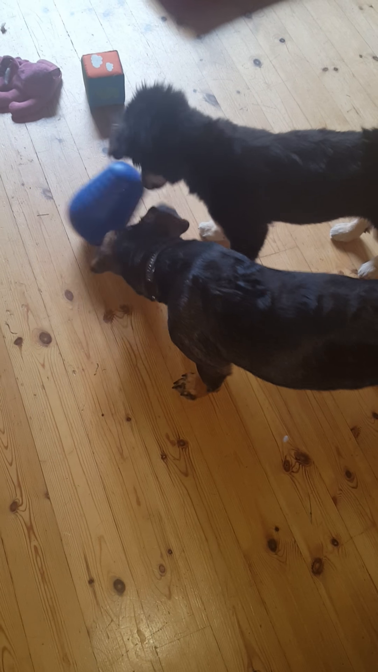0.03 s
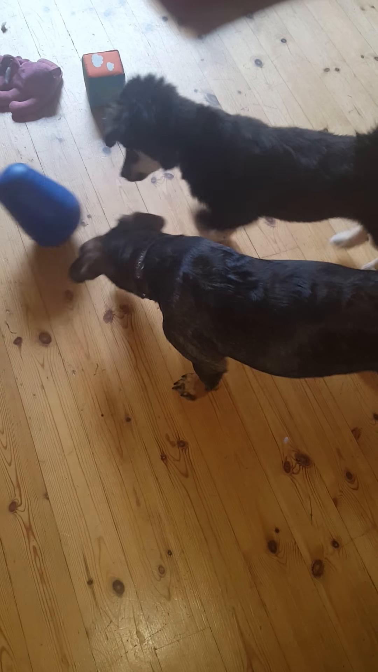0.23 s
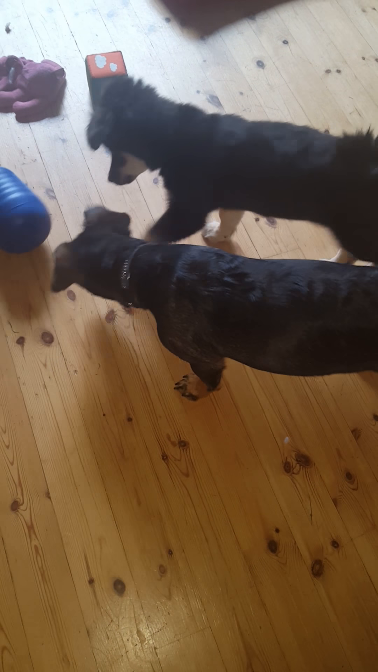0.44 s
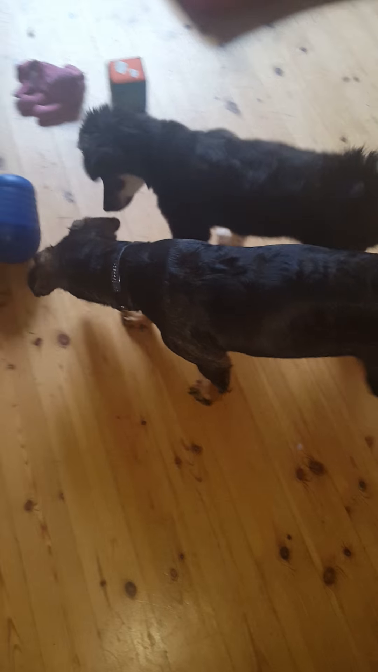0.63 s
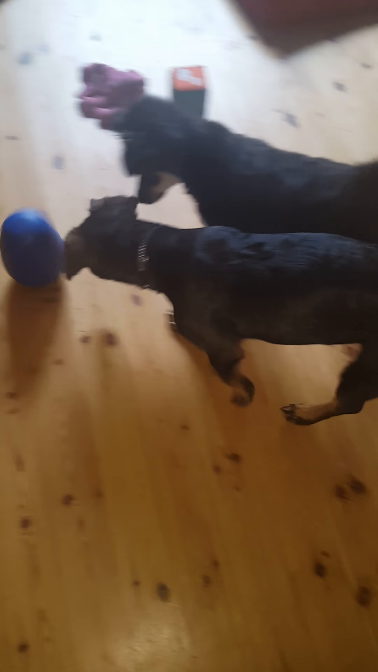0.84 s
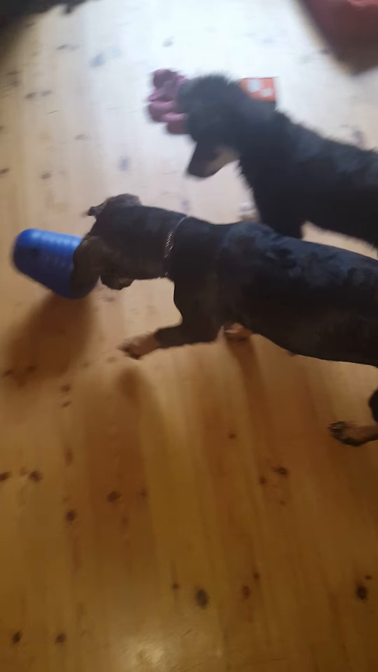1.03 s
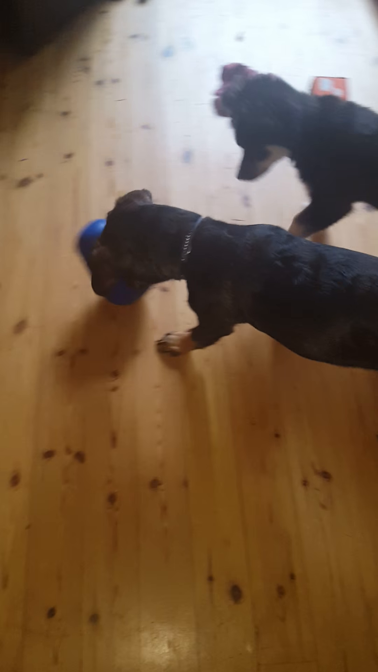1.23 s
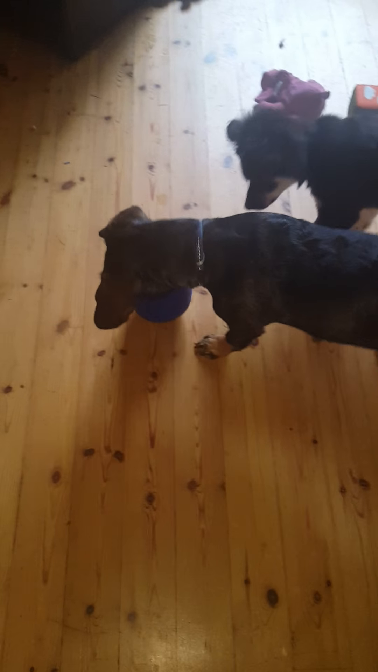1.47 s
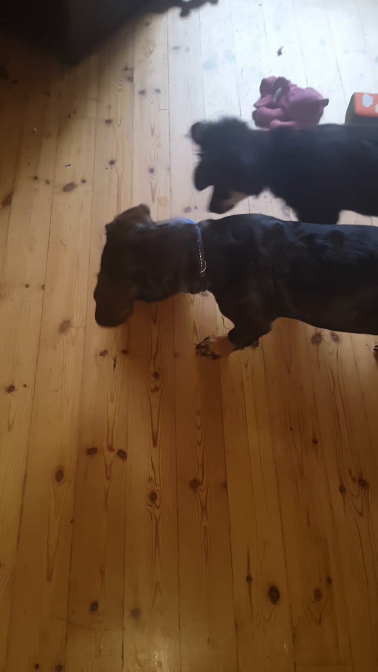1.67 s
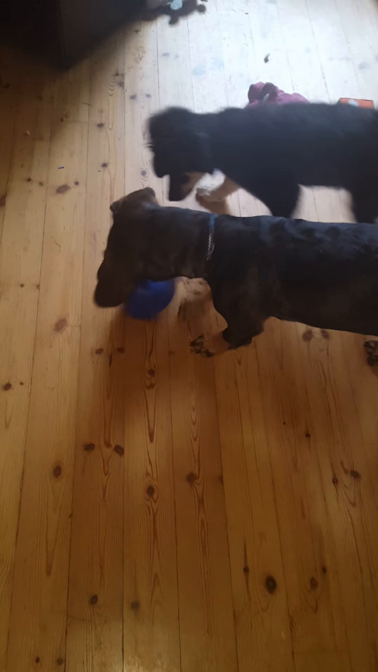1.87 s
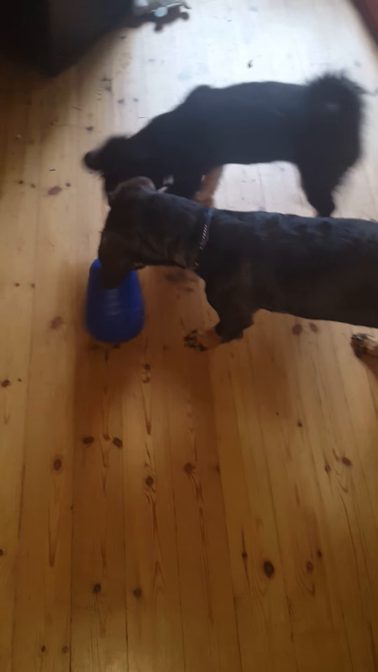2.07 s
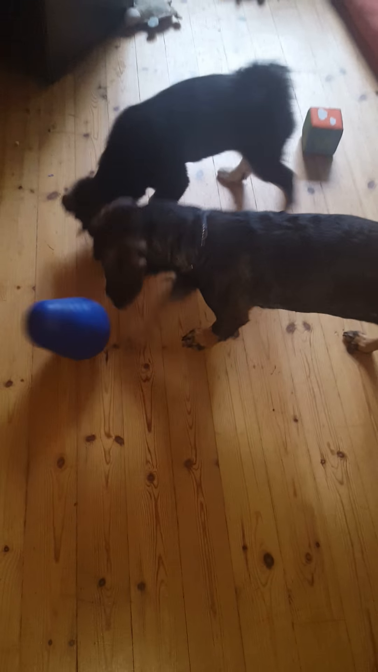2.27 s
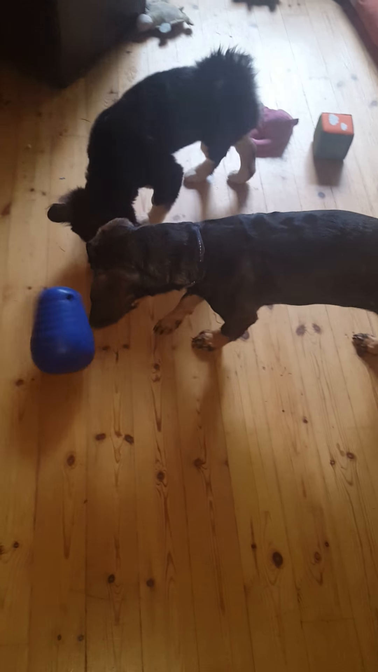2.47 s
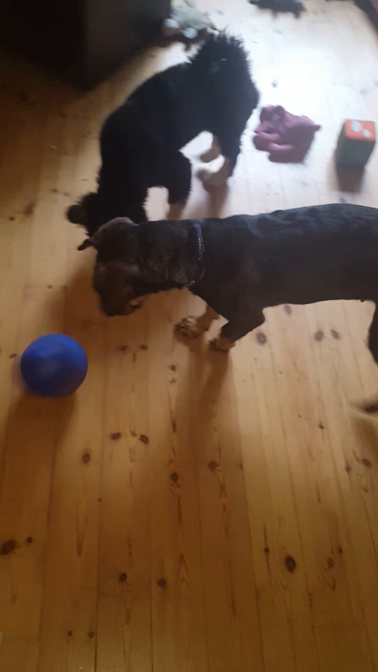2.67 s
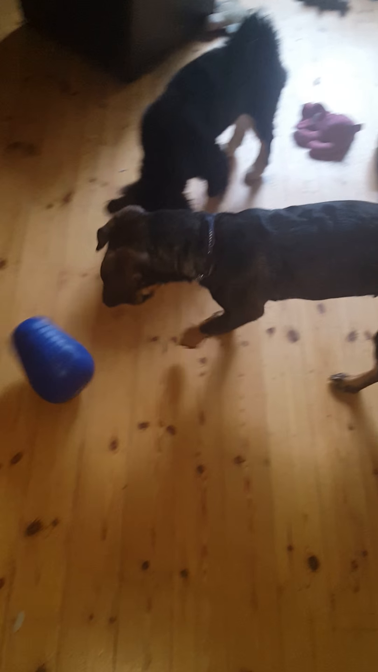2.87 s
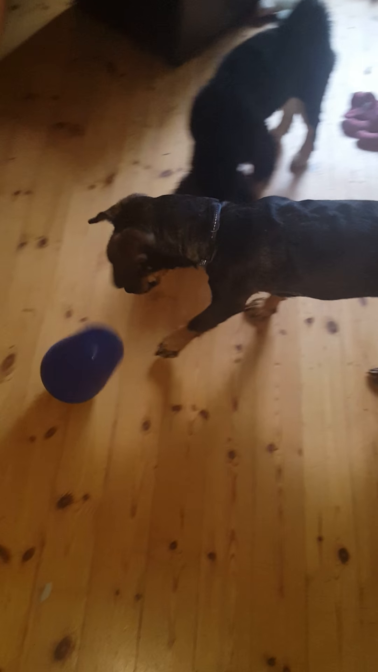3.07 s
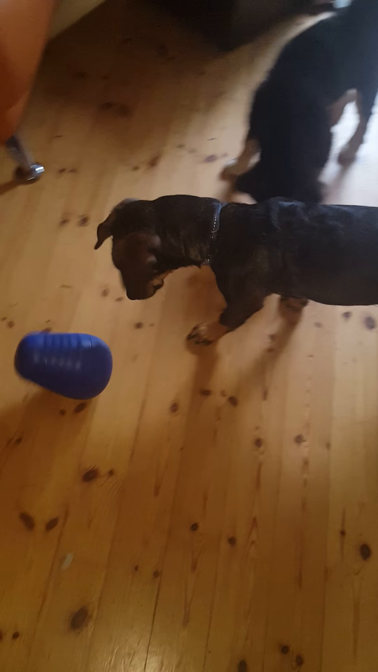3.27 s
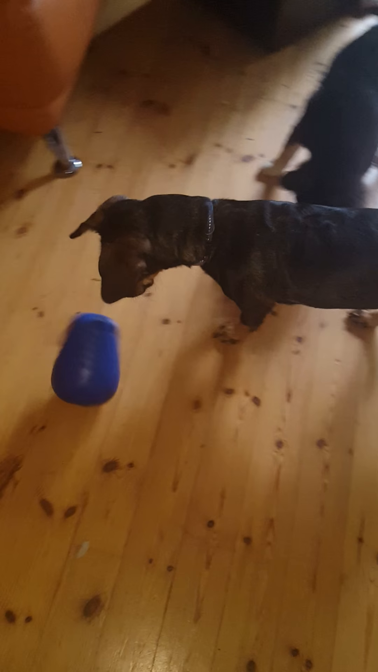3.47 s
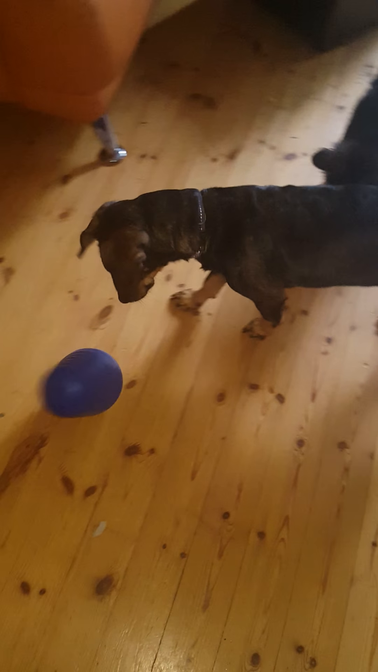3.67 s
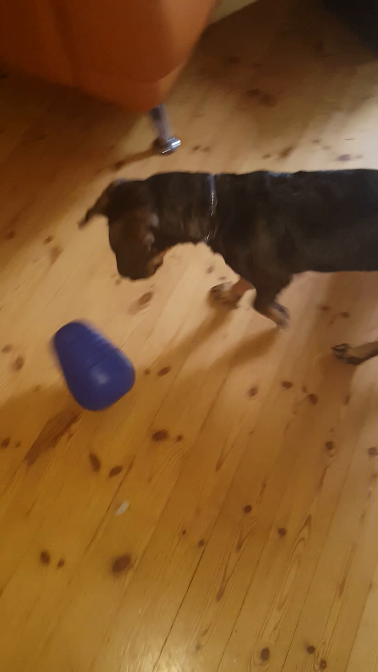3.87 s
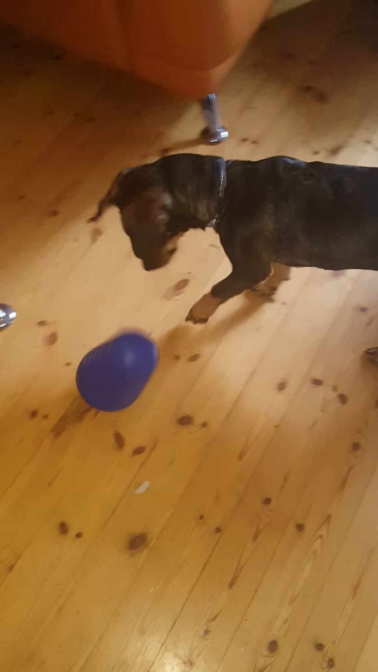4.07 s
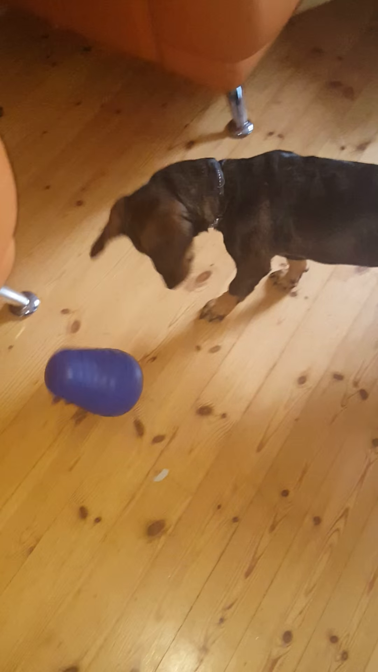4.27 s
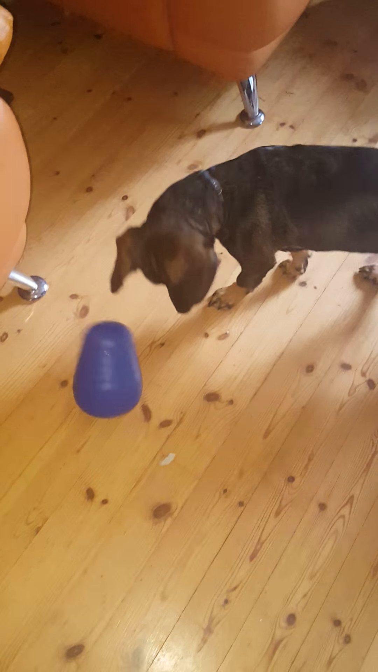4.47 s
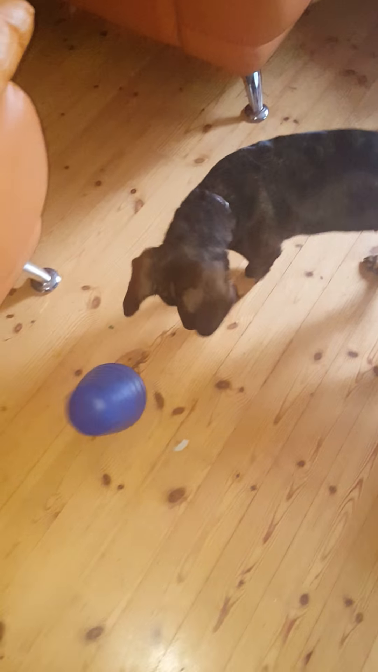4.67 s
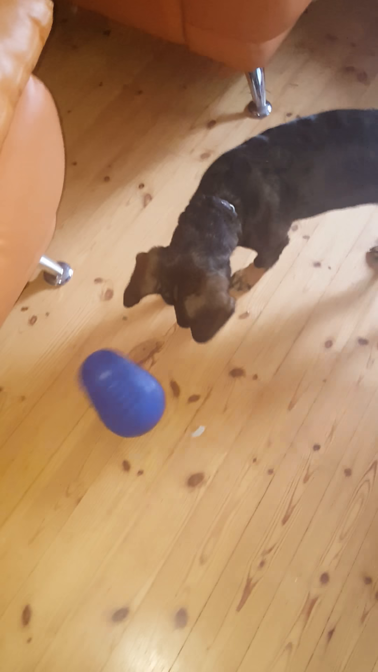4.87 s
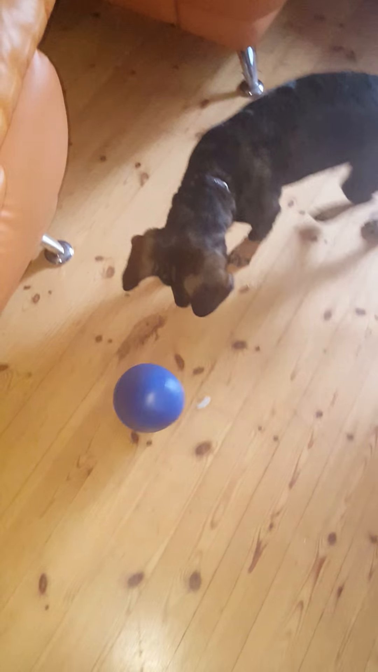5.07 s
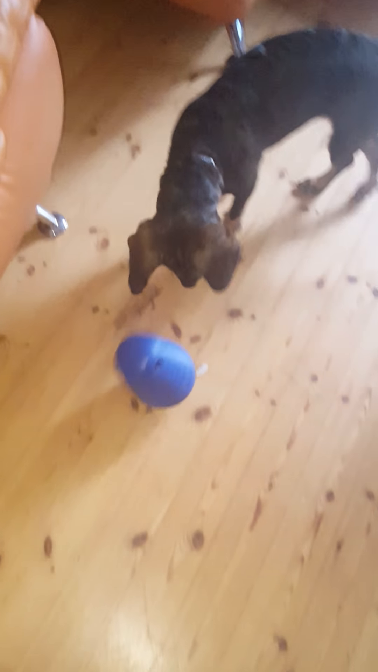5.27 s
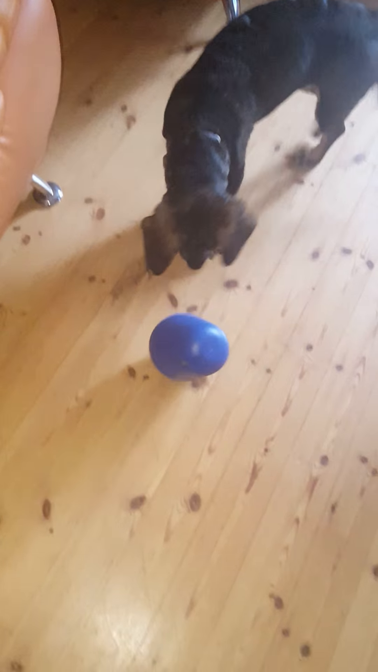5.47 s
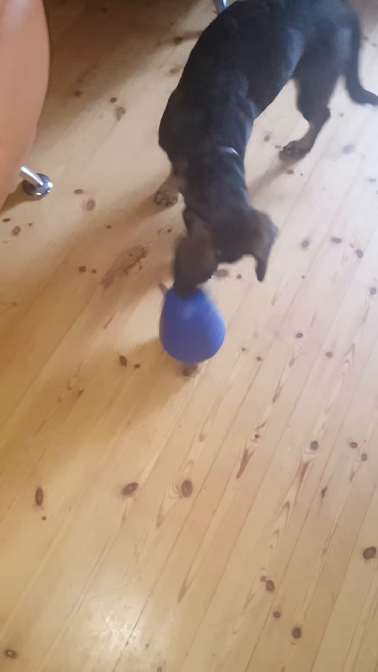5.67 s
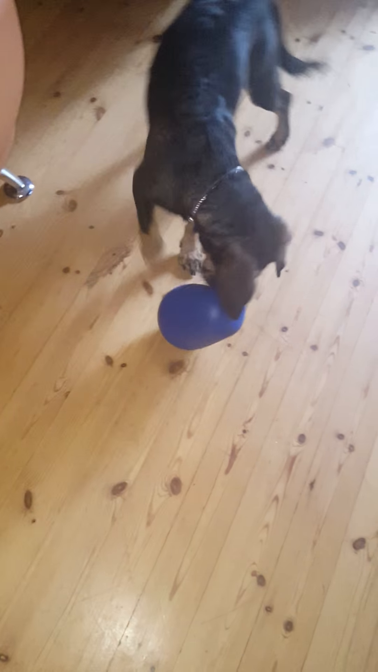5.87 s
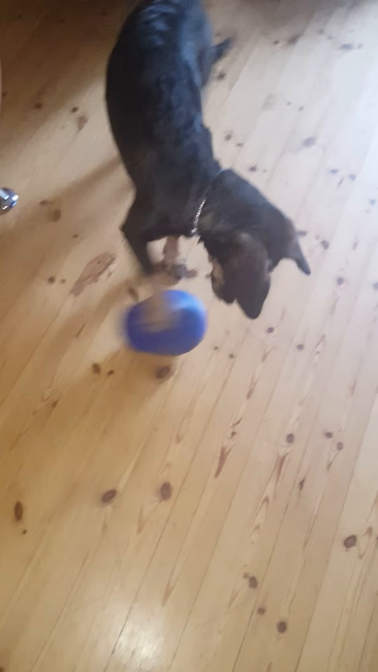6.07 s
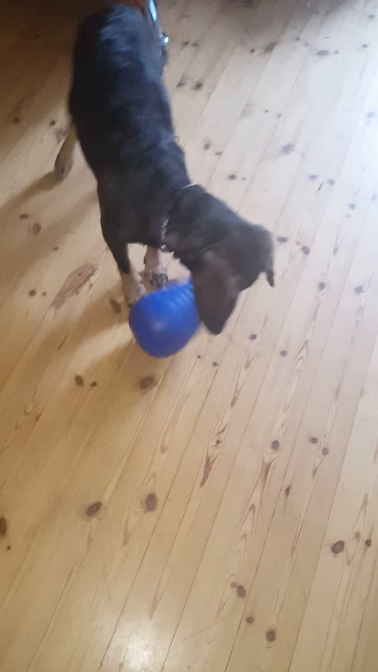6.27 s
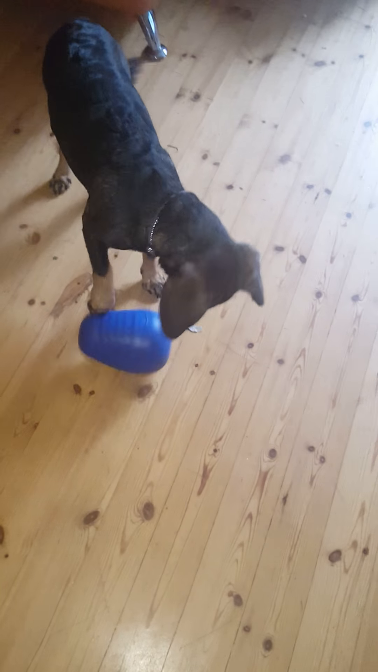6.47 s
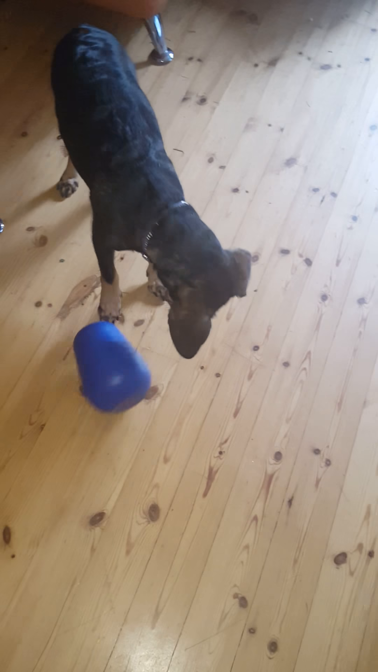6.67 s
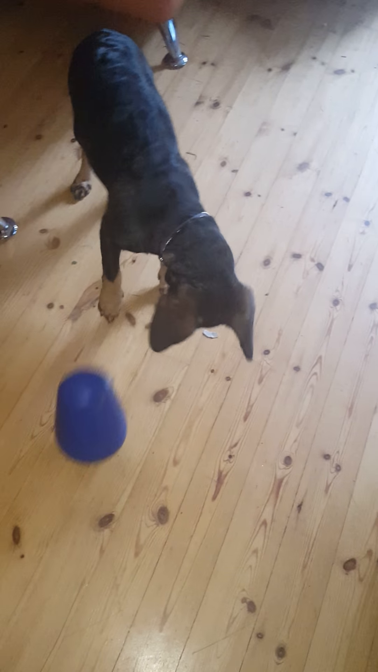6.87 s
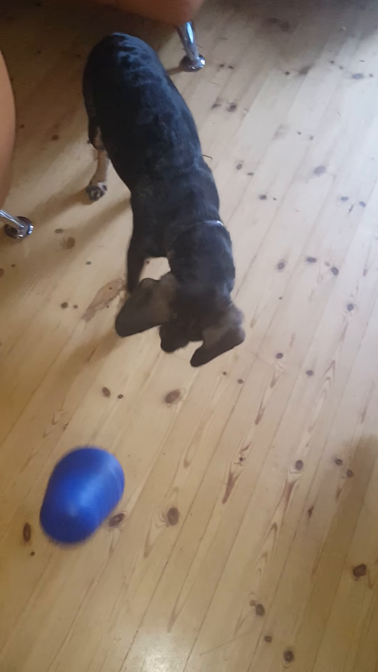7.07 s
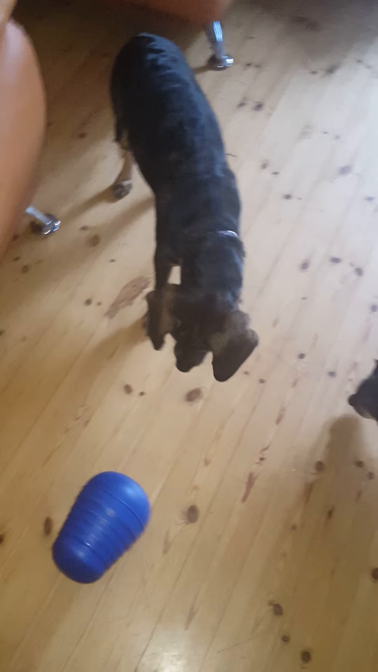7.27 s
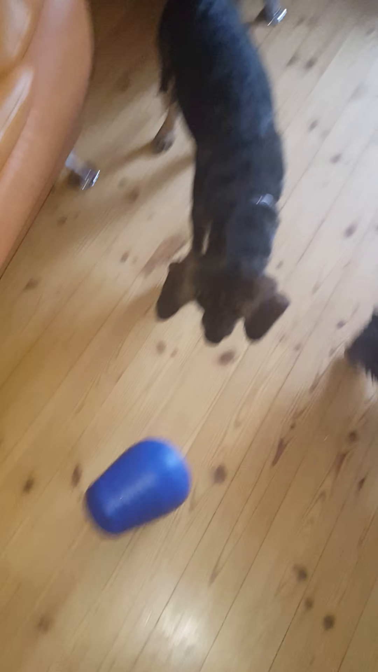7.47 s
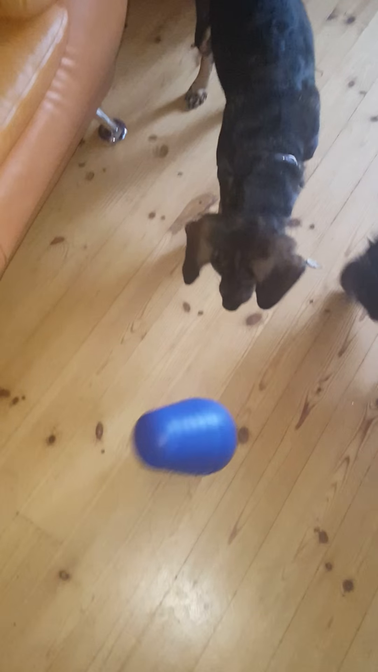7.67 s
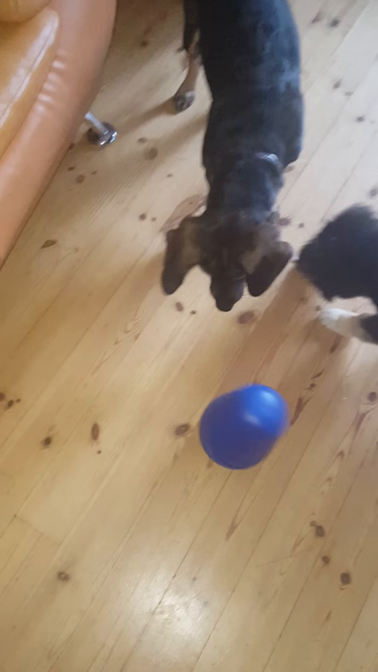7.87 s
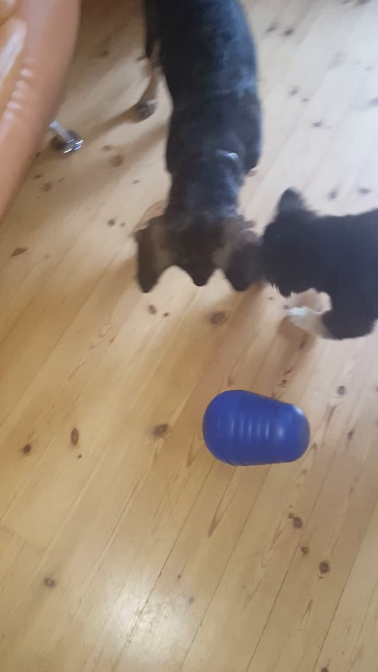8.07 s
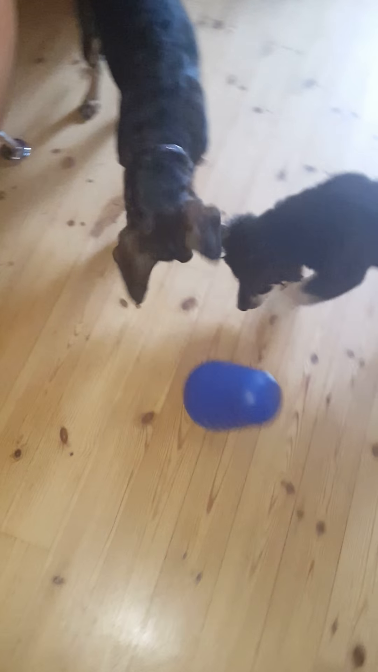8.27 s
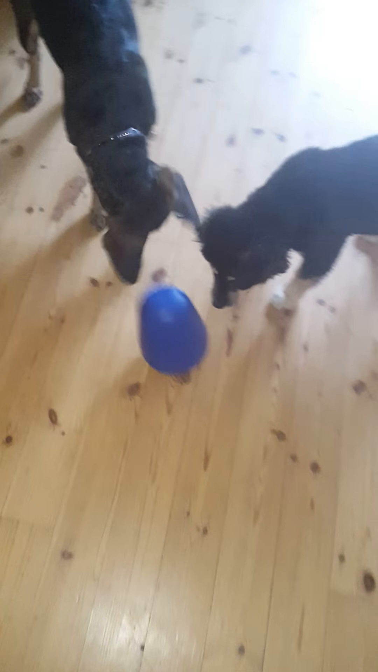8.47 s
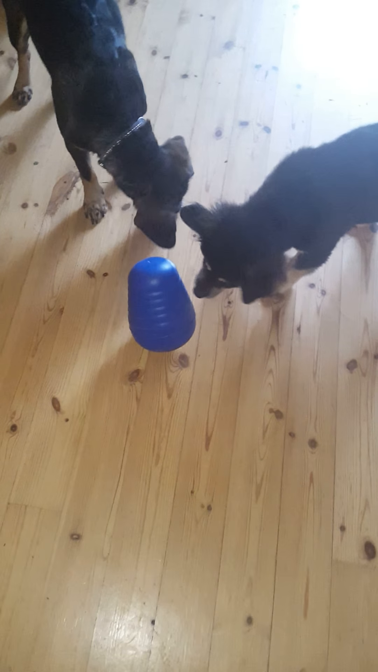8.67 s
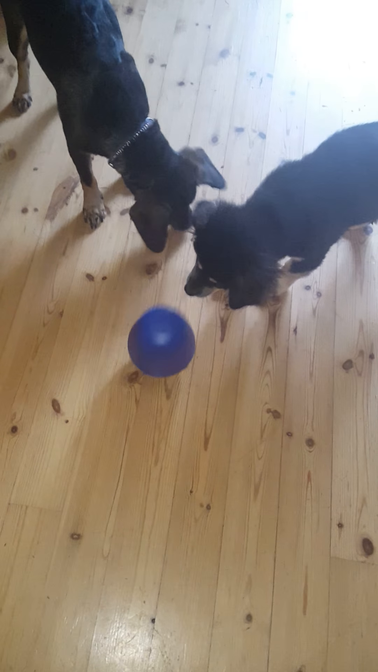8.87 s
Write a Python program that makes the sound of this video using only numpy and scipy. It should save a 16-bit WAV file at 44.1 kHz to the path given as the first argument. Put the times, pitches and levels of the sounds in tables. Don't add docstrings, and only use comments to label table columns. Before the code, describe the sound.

A hollow hard-plastic toy with loose pellets is pushed over wooden floorboards in a living room. From 0 to 1 s it rolls with low woody thuds, rattling pellets and sharp clacks near 0.35 and 0.6 s. Lighter knocks follow, a crack at 1.4 s, then a tight bouncing clatter at 1.75-2 s with a bright pellet drop. Another knock comes at 2.3 s. From 2.5 to 6 s it fades to soft rocking, dull small bumps, faint sliding and lone ticks. At 6.2-6.65 s claws set off the loudest burst: booming boards, hard plastic cracks, dense rattling. Bumps continue to 7 s, with clacks around 7.1-7.2 s, then near quiet. A thud at 7.9 s, a sharp double crack at 8.1 s, and smaller bumps and rattles lead to a last thud near 8.9 s. Close stereo, brighter at right, short room reverberation, faint air.

```python
import sys
import numpy as np
from scipy import signal
from scipy.fft import rfft, irfft, next_fast_len
from scipy.io import wavfile

SR = 44100
rng = np.random.default_rng(int(sys.argv[2]) if len(sys.argv) > 2 else 0)


def store_wav(level_fs):
    pcm = np.round(np.clip(np.atleast_2d(level_fs), -1, 1) * 32767)
    wavfile.write(sys.argv[1], SR, pcm.T.astype(np.int16))


def how_loud(loudness_db):
    steps = np.asarray(loudness_db, float) / 20
    return 10 ** steps


N = 392931


def unit(x):
    return x / np.sqrt(np.mean(x ** 2) + 1e-20)


def along(points, hz):
    f, v = np.transpose(points)
    return np.interp(np.log(hz + 1), np.log(f + 1), v)


def curves(rows):
    s, *cols = np.transpose(rows)
    return [np.interp(np.arange(N) / SR, s, c) for c in cols]


def filtered(x, response):
    m = next_fast_len(x.shape[-1] + SR // 4)
    spectrum = rfft(x, m) * response(np.fft.rfftfreq(m, 1 / SR))
    return irfft(spectrum, m)[..., :x.shape[-1]]


def shaped(x, points):
    return filtered(x, lambda hz: how_loud(along(points, hz)))


def swells(s, db, rise_s, fall_s):
    t = np.arange(0, N / SR + .002, .001)[:, None]
    level_db = db - 20 * np.maximum((s - t) / np.abs(rise_s), (t - s) / np.abs(fall_s))
    total_db = 10 * np.log10(np.sum(how_loud(2 * level_db), axis=1) + 1e-12)
    return np.interp(np.arange(N) / SR, t[:, 0], total_db)


def together(a_db, b_db):
    return 10 * np.log10(how_loud(2 * a_db) + how_loud(2 * b_db))


def taps(rate, spread_db):
    chance, size, sign = rng.random((3, N))
    strength = how_loud(-spread_db * np.log(size + 0.0377))
    return (chance < rate / SR) * strength * np.sign(sign - .5)


def wobble(rate, depth_db):
    knots = how_loud(depth_db * rng.standard_normal(int(N * rate / SR) + 2))
    return np.interp(np.arange(N) * rate / SR, np.arange(len(knots)), knots)


def near(centre_hz, pull):
    return lambda hz: 1 / (1 + (pull * np.log(hz / centre_hz)) ** 2)


def turning(hits, table, steep, swing_db, lean=lambda hz: 1):
    m = next_fast_len(N + SR // 8)
    f = np.fft.rfftfreq(m, 1 / SR).astype(np.float32)
    spectrum = rfft(hits.astype(np.float32), m)
    out = 0
    for k, (c, w, db) in enumerate(table):
        resonance = 1j * f * w / (c * c - f * f + 1j * f * w)
        mode = resonance.astype(np.complex64) ** np.float32(steep)
        gain = (-1) ** k * how_loud(db) * lean(c) * wobble(rate=11, depth_db=swing_db)
        out = out + gain * irfft(spectrum * mode, m)[..., :N]
    return unit(out)


def ring(table, t, damp, bright_hz, slope_db):
    hz, width, db = np.transpose(table)[..., None, None]
    scatter_db = 4 * rng.standard_normal((len(table), 2, 1))
    level = how_loud(db - slope_db * np.abs(np.log2(hz / bright_hz)) + scatter_db)
    phase = 1.33 * rng.random((len(table), 2, 1))
    waves = level * np.exp(-np.pi * damp * width * t) * np.sin(2 * np.pi * hz * t + phase)
    wave = waves.sum(axis=0) * (1 - np.exp(-t / 0.001043)) ** 2
    return wave / np.abs(wave.mean(axis=0)).max()


# t/s, rumble level/dB, deep level near a joist/dB, knock level near a board edge/dB
ROLL_PATH = [(0.0, -38, -6.5, -19.5), (1.0, -46, -1, -24), (1.7, -44, -4, -27.5), (1.9, -50.5, -5.5, -14),
             (2.5, -47, -2, -25.5), (3.3, -51, 3, -20), (3.7, -61.5, -6.5, -26), (4.6, -66.5, -12.5, -20),
             (5.0, -60.5, -7.5, -15.5), (5.9, -70, -8.5, -16.5), (6.2, -51, -35.5, -1.5),
             (6.4, -45.5, -18, -12), (6.9, -61.5, -9.5, -22), (7.5, -61.5, 4.5, -16.5),
             (8.0, -41, -15, -25.5), (8.4, -51.5, -2.5, -9.5), (8.5, -48.5, -14, -19.5),
             (8.91, -60, -7.5, -14.5)]
# peak t/s, level/dB, rise per 20 dB/s, fall per 20 dB/s
BASE_ROCKS = [(0, -17.5, .05, 0.08), (0.249, -26.5, 0.15, 0.15), (.5, -38.5, 5, 0.62),
              (0.938, -26.5, 0.144, 0.18), (1.55, -44.5, 1.5, 2.17), (1.756, -13, 0.0226, 0.3156),
              (1.84, -17, 0.1, 0.1892), (2.27, -21, 0.01, 0.183), (2.41, -35, 0.0954, 0.3449),
              (2.78, -34, 0.47, 0.2739), (3.18, -34, 0.07, 0.03), (3.68, -33.5, 0.02, 0.2339),
              (3.78, -35, 0.59, -0.16), (4.135, -36.5, 0.05, 0.4448), (4.47, -40.5, 0.7, 0.11),
              (4.671, -39, 0.53, 0.18), (5.063, -27.5, 0.034, 0.1132), (5.443, -29.5, 0.1021, 0.1375),
              (5.753, -45.5, 0.22, 0.0878), (5.809, -25.5, 0.0963, 0.0865), (6.226, -13.5, -0.0145, 0.3181),
              (6.41, -16, 0.1078, 0.281), (6.57, -14.5, 0.1326, 0.0822), (6.781, -21, 0.003, 0.336),
              (7.001, -22.5, 0.0283, 0.2069), (7.5, -50, 0.34, -1.66), (7.932, -17.5, 0.0124, 0.0228),
              (8.25, -42, -0.67, -0.46), (8.4, -40, -1, 2.54), (8.51, -21, 0.028, 0.1336)]
# t/s, loudest floor mode f/Hz
PLANK_PITCH = [(0.0, 227), (0.57, 217), (0.79, 183.3), (0.89, 212.6), (3.45, 196.2), (3.57, 236.2),
               (5.86, 247), (6.08, 197.5), (6.16, 255), (7.27, 239), (7.35, 182), (7.4, 262), (7.77, 189),
               (7.87, 263), (8.19, 214.6), (8.69, 250), (8.79, 201.1), (8.91, 273)]
# t/s, peak level/dB, board f/Hz
BASE_THUDS = [(0.072, -14.5, 244.9), (0.232, -6, 236.3), (0.478, -20, 240.6), (0.913, -9.5, 250),
               (1.742, -6, 212.9), (2.257, -9.5, 184.7), (2.46, -25, 132.7), (2.687, -20.5, 196.7),
              (2.976, -25, 134.9), (3.235, -20, 142), (3.659, -26, 250), (3.931, -29.5, 259.5),
              (4.124, -24.5, 246.6), (4.462, -23, 247.9), (5.054, -22, 302.7), (5.431, -20.5, 261.7),
              (5.743, -25, 263), (6.192, -9, 233.5), (6.214, -3, 315.5), (6.411, -8, 307.5),
              (6.765, -6.5, 250.3), (6.862, -17, 237.8), (6.99, -9.5, 287.1), (7.052, -10, 260.7),
              (7.488, -27, 250.2), (7.799, -29.5, 243.3), (7.892, -2.5, 255.4), (8.394, -31.5, 250),
              (8.492, -13, 250), (8.896, -9, 280)]
# t/s, peak level/dB, board f/Hz
BASE_BOUNCES = [(0.255, -11, 243.5), (0.311, -18, 230.3), (0.681, -26.5, 250), (0.94, -15.5, 250),
                (0.972, -23, 238), (1.528, -27, 190), (1.6, -29, 195.5), (1.77, -8.5, 194.7),
                (1.79, -9.5, 190), (1.811, -5.5, 206.9), (1.838, -8.5, 224), (1.864, -15, 199.6),
                (2.4, -33.5, 229.3), (2.521, -23.5, 150.7), (2.735, -21.5, 199.7), (2.791, -20, 200.7),
                (3.128, -25, 138), (3.735, -27.5, 250), (3.775, -36.5, 250), (4.143, -33, 250),
                (4.195, -32, 255.7), (4.366, -31.5, 250), (4.637, -33, 255), (5.114, -23, 284.6),
                (5.42, -29, 254.8), (5.795, -17, 253.8), (6.258, -7.5, 234.5), (6.316, -12.5, 269),
                (6.369, -4, 297.8), (6.45, -6.5, 295.3), (6.484, -8, 287.7), (6.518, -9.5, 299.7),
                (6.541, -9, 258.4), (6.632, -14.5, 203), (6.801, -23.5, 242), (6.833, -22, 259),
                (6.888, -19.5, 246), (6.917, -21, 247), (7.012, -13.5, 288), (7.1, -28, 258.2),
                (7.141, -29.5, 241.3), (7.389, -26.5, 250.3), (7.934, -13.5, 250.7), (7.982, -19.5, 247.2),
                (8.254, -37.5, 228.6), (8.507, -13, 253.4), (8.532, -17.5, 247.6), (8.579, -22, 235.5)]
# f/Hz, width/Hz, level/dB
BOARD_MODES = [(174.4, 81.7, -2.5), (250, 29.97, 4), (314.4, 106.3, -9.5), (365.2, 69, -6)]
# f/Hz, width/Hz, level/dB
JOIST_MODES = [(102.6, 24.9, -12), (130.42, 30.9, 5)]
# f/Hz, width/Hz, level/dB
KNOCK_MODES = [(408.3, 21.2, -8.5), (446.8, 41.2, 3), (528.8, 218, -7), (609, 28.9, -2), (676.3, 24, -14.5)]
# f/Hz, width/Hz, level/dB
BELLY_MODES = [(776.9, 25.3, -1.5), (930, 59.7, -5), (1203.3, 32.16, -2), (1378, 66.6, -7)]
THUD_T60_S, BOUNCE_T60_S = 0.1109, 0.0793


def base():
    rumble_db, deep_db, knock_db = curves(ROLL_PATH)
    boom_db = together(rumble_db, swells(*np.transpose(BASE_ROCKS)))
    plank_hz, = curves(PLANK_PITCH)
    bumps = taps(rate=170, spread_db=1.74) + 0.019 * rng.standard_normal(N)
    roll = turning(bumps, BOARD_MODES, steep=1.379, swing_db=1.0, lean=near(plank_hz, pull=2.055))
    roll += how_loud(deep_db + 2.98) * turning(bumps, JOIST_MODES, steep=2.704, swing_db=0.06)
    knock = how_loud(boom_db + knock_db - 1.5) * turning(bumps, KNOCK_MODES, steep=1.016, swing_db=4.5)
    knock = np.array([knock, np.roll(knock, SR // 2000)])
    out = np.pad(how_loud(boom_db - 6.5) * roll + knock, ((0, 0), (0, SR)))
    t = np.arange(SR // 6) / SR
    drops = [(*row, THUD_T60_S) for row in BASE_THUDS]
    drops += [(*row, BOUNCE_T60_S) for row in BASE_BOUNCES]
    for s, db, hz, t60_s in drops:
        neighbour_hz = hz * rng.choice([.8, 1.2])
        beat = np.sin(2 * np.pi * hz * t) + .5 * np.sin(2 * np.pi * neighbour_hz * t)
        boom = beat * how_loud(-60 * t / t60_s) * (1 - np.exp(-t / 0.00337)) ** 2
        body = ring(KNOCK_MODES + BELLY_MODES, t, damp=1.0, bright_hz=500, slope_db=4.0)
        body *= how_loud(-26.5) * (1 - np.exp(-t / 0.00037))
        out[:, round(s * SR):][:, :len(t)] += how_loud(db - 2) * (boom + body)
    return filtered(out[:, :N], lambda f: (1j * f / (70 + 1j * f)) ** 3)


# peak t/s, level/dB, rise per 20 dB/s, fall per 20 dB/s
PELLET_SLIDES = [(0, -34, .1, -0.04), (.15, -39.5, -24.86, 0.67), (0.476, -28.5, 0.2119, 0.14),
                 (1.14, -39.5, 0.07, 0.63), (1.67, -32.5, 0.0657, -0.24), (1.904, -22, 0.1638, 0.21),
                 (2.793, -46, 0.26, -0.0022), (3.21, -57, 0.0862, 0.34), (3.391, -60, 0.0143, 0.0549),
                 (3.699, -62.5, 0.1, -1.9), (3.872, -52.5, -0.2629, 0.16), (3.92, -51, -0.1451, 0.2149),
                 (4.21, -51, -0.12, 0.51), (4.31, -49, 0.19, 0.28), (4.7, -55.5, 0.13, 0.48),
                 (4.89, -47.5, 0.3725, 0.0655), (5.097, -52.5, 0.07, 0.3), (5.38, -46, 0.17, 0.0366),
                 (5.31, -48, 0.047, 0.05), (5.7, -55, 0.05, -0.31), (6.62, -25, 0.2359, 0.32),
                 (6.88, -37.5, -0.004, 0.47), (6.95, -33.5, 0.0065, 0.0842), (7.001, -32.5, -0.0137, 0.12),
                 (7.217, -27.5, 0.14, 0.2384), (7.5, -51.5, -1.37, 0.37), (7.94, -52.5, 1.01, 0.7),
                 (8.05, -51.5, 0.5, -2), (8.621, -42, 0.0541, 0.5), (8.77, -32, 0.2012, 0.13)]
# t/s, level/dB, fall per 20 dB/s, tick level re wall/dB
PELLET_THROWS = [(0.343, -36.5, 0.4359, -20), (0.635, -36.5, 0.5644, -10.5), (1.435, -32, 0.19, 2.5),
                 (1.647, -39.5, 0.0663, 8.5), (2.304, -32, 0.2171, -3.5), (2.87, -52.5, 0.2376, -33.5),
                 (4.372, -40.5, 0.0783, 0.5), (5.245, -48, 0.46, -31.5), (5.56, -51, 0.4, -18.5),
                 (5.991, -65, 0.7, -34), (6.044, -42.5, 0.18, 5), (6.224, -24.5, 0.5672, -21.5),
                 (6.32, -22.5, 0.42, -14.5), (6.52, -24.5, 0.1354, -4), (7.099, -29, 0.1682, -7.5),
                 (8.118, -28.5, 0.2823, -10), (8.7, -30, -0.135, -5)]
# t/s, loudest belly mode f/Hz, belly level re wall/dB
PELLET_HEAP = [(0.0, 1153, -6), (2.0, 1178, -8), (2.58, 1149, -4.5), (3.3, 1047, 3.5), (3.9, 1077, -0.5),
               (4.3, 997.5, -3), (4.84, 1073, -3.5), (5.06, 936, 4), (5.34, 989, -5.5), (5.95, 903, -5.5),
               (6.25, 754, -1.5), (6.72, 1218, -8.5), (7.03, 930, -5), (7.25, 1168, -9), (7.9, 930, 2.5),
               (8.15, 1120, -8), (8.6, 930, -3.5), (8.91, 1040, -10)]
# f/Hz, width/Hz, level/dB
WALL_MODES = [(1714.2, 80.7, -17.5), (2330, 237, -6), (2460, 122.4, -4), (2679.7, 76.5, -3.5),
              (2987.6, 243, -10), (3500, 169.6, -3.5)]
# f/Hz, width/Hz, level/dB
NECK_MODES = [(4266.3, 192, 4.5), (4658, 250, 6), (5356, 970, -5), (7124, 195, -8)]
# f/Hz, level/dB
CONTACT_TICK = [(3000, -26.5), (6000, 3.5), (8000, 2.5), (11000, -3.5), (15000, -9), (16200, -34)]
# f/Hz, level/dB
RASP = [(900, -28), (1500, -1), (2000, -5.5), (3800, 1), (6000, -11), (9000, -32)]
THROW_RISE_S, SLIDE_TICK_DB = 0.014, -15
TICK_FALL = 0.782


def pellets():
    s, db, fall_s, hard_db = np.transpose(PELLET_THROWS)
    slide_db = swells(*np.transpose(PELLET_SLIDES))
    wall_db = together(slide_db, swells(s, db, THROW_RISE_S, fall_s))
    throw_tick_db = swells(s, db + hard_db, THROW_RISE_S, TICK_FALL * fall_s)
    tick_db = together(slide_db + SLIDE_TICK_DB, throw_tick_db) - wall_db
    heap_hz, belly_db = curves(PELLET_HEAP)
    shared = taps(rate=200, spread_db=1.0)
    own = np.array([taps(rate=600, spread_db=3.0), taps(rate=600, spread_db=0.5)])
    hits = (0.5 * shared + own) * wobble(rate=45, depth_db=2.5)
    wall = turning(hits, WALL_MODES, steep=1.2, swing_db=2.2)
    belly = turning(hits, BELLY_MODES, steep=0.925, swing_db=2.5, lean=near(heap_hz, pull=4))
    neck = turning(hits, NECK_MODES, steep=1.1, swing_db=2.2)
    tick = unit(shaped(hits, CONTACT_TICK))
    shell = wall + how_loud(belly_db + 2.114) * belly
    shell += how_loud(0.25 * tick_db - 1.5) * neck + how_loud(tick_db - 2.0) * tick
    shell += how_loud(-9.5) * unit(shaped(hits, RASP))
    return how_loud(wall_db - 6.0) * shell


# t/s, peak level/dB, belly level/dB, brightest f/Hz, tick level/dB
CLAW_BLOWS = [(0.3379, -14, -23, 4165, -10.5), (0.6237, -14.5, -28, 5134, -7.5),
              (1.4321, -21.5, -5, 3075, 7.5), (2.2978, -17.5, 4.5, 4110, -2.5),
              (2.3079, -16.5, -6.5, 2910, 0), (4.368, -28, -6, 2755, -8.5),
              (6.0376, -20.5, -45.5, 4076, -1), (6.1655, -28.5, -7, 2330, -6.5),
              (6.192, -21.5, -2, 3580, -10), (6.2165, -14, 1.5, 2833, -8), (6.316, -18, -1.5, 2560, -8.5),
              (6.3788, -5.5, -5, 3598, -11), (6.5138, -9, -4.5, 3490, -4), (6.5704, -17.5, -8, 3240, -7.5),
              (6.5995, -12.5, -34, 4410, -16), (7.0953, -21, -20.5, 3057, -9.5),
              (7.1494, -8.5, -11.5, 3120, -15), (7.171, -12, -5, 2820, -18.5),
              (7.185, -11.5, -6.5, 2720, -23), (8.09, -7.5, -11.5, 3140, -14),
              (8.115, -7.5, -18, 3566, -10), (8.6975, -20.5, -22, 3286, -17.5)]
# t/s, peak level/dB, belly level/dB, brightest f/Hz
HEAP_DROPS = [(0.404, -21, -4, 3440), (1.834, -20, -25.5, 3560), (1.8678, -18, -5, 2930),
              (1.879, -4.5, -9.5, 2980), (2.11, -22.5, -6, 2890), (2.8672, -35, -15.5, 2590),
              (5.2411, -32.5, -11, 2860), (6.6568, -11, -10, 2460), (6.8281, -25.5, 2, 2190),
              (6.8575, -22, 1, 2654), (6.9208, -19.5, -16, 2570), (6.9403, -18, -34.5, 3690),
              (6.9906, -19, -29, 2330), (7.027, -24, -5.5, 2330), (7.1274, -20, -15, 2780),
              (7.209, -18, -18.5, 2630), (7.238, -16, -5.5, 2800), (7.4829, -29.5, -5, 2730),
              (8.202, -16, -8, 2897), (8.2591, -26, -20, 2330)]
# t/s, peak level/dB, brightest f/Hz
LONE_PELLETS = [(1.292, -25.5, 4250), (2.585, -39.5, 7200), (2.778, -34, 3600), (2.93, -42.5, 4780),
                (3.131, -45, 3140), (5.0898, -39.5, 3250), (5.215, -38, 2870), (5.293, -29, 3215),
                (5.554, -39.5, 4180), (5.6109, -34, 3470), (5.6673, -36.5, 3370), (5.986, -37.5, 3500),
                (7.9148, -34.5, 4132), (7.986, -35, 3590), (8.018, -38, 2400), (8.477, -30.5, 3650),
                (8.595, -29.5, 3400),
                (0.152, -29.5, 3040), (0.418, -21, 2790), (0.448, -21.5, 2755), (0.473, -21.5, 2800),
                 (0.501, -22.5, 3135), (0.699, -27, 4040), (1.106, -28, 2720), (1.148, -25.5, 3500),
                 (1.198, -31, 3500), (1.336, -24, 3500), (1.447, -18.5, 2790), (1.902, -13.5, 2930),
                 (1.957, -13.5, 2810), (2.03, -25.5, 3020), (2.444, -31, 2650), (2.726, -42, 3170),
                 (3.892, -42, 2600), (3.913, -42.5, 2580), (4.266, -44, 3400), (4.312, -36, 2664),
                 (4.366, -32, 513), (4.851, -38.5, 2970), (4.879, -34.5, 3610), (5.311, -35, 3440),
                 (5.361, -33.5, 4325), (6.047, -23, 3910), (6.239, -20, 3020), (6.337, -13, 4030),
                 (6.456, -16.5, 3500), (6.625, -9, 3500), (6.743, -31, 2880), (6.751, -27, 2700),
                 (7.034, -29, 4320), (2.873, -43, 2917), (8.608, -44, 2993), (8.38, -48.5, 8070),
                 (6.976, -33, 2330), (7.464, -45.5, 3000), (8.069, -44, 1200), (8.542, -35.5, 4600),
                 (8.625, -30, 4210), (8.685, -24, 4280)]
DROP_TICK_DB = -17
LONE_BELLY_DB, LONE_TICK_DB = -17, -27


def clacks():
    out = np.zeros((2, N + SR))
    t = np.arange(SR // 12) / SR
    blows = [*CLAW_BLOWS, *[(*row, DROP_TICK_DB) for row in HEAP_DROPS]]
    blows += [(s, db, LONE_BELLY_DB, hz, LONE_TICK_DB) for s, db, hz in LONE_PELLETS]
    for s, db, belly_db, hz, tick_db in blows:
        burst = how_loud(-60 * t / 0.0244) * (1 - np.exp(-t / 0.0012))
        crack = shaped(burst * rng.standard_normal((2, len(t))), CONTACT_TICK)
        local_modes = [(.93 * hz, 500, 0), (1.08 * hz, 600, 0)]
        blow = .6 * ring(WALL_MODES + NECK_MODES, t, damp=1.2, bright_hz=hz, slope_db=12)
        blow += .6 * ring(local_modes, t, damp=1, bright_hz=hz, slope_db=0)
        blow += how_loud(belly_db - 5.5) * ring(BELLY_MODES, t, damp=0.962, bright_hz=1301, slope_db=14.5)
        blow += how_loud(tick_db - 0.5) * crack / np.abs(crack).max()
        out[:, round(s * SR):][:, :len(t)] += how_loud(db - 1.74) * blow
    direct = out[:, :N]
    return direct + how_loud(-17) * np.roll(direct, round(0.0042 * SR), axis=1)


# f/Hz, likeness/1
LIKENESS = [(60, 1), (300, 0.944), (480, 0.826), (2000, 0.017), (12000, .15)]


def pair(a, b, hz):
    turn = np.arccos(np.clip(along(LIKENESS, hz), 0, 1)) / 2
    mid, side = np.cos(turn) * a, np.sin(turn) * b
    return np.array([mid + side, mid - side])


# f/Hz, t60/s
ROOM_DECAY = [(150, 0.423), (700, 0.411), (2000, 0.61), (5000, 0.352), (13000, 0.1448)]


def room(x):
    out, block = np.zeros((2, N + 2 * SR)), SR // 2
    for at in range(0, N, block):
        hz, t, z = signal.stft(rng.standard_normal((2, SR // 2)), SR, nperseg=512)
        decay = how_loud(-60 * t / along(ROOM_DECAY, hz)[:, None])
        tail = signal.istft(pair(*z, hz[:, None]) * decay, SR, nperseg=512)[1]
        wet = signal.fftconvolve(x[None, at:at + block], tail / np.linalg.norm(tail[0]), axes=1)
        out[:, at + 130:][:, :wet.shape[1]] += wet
    return out[:, :N]


# f/Hz, level per Hz/dB
AIR = [(15, -22), (25, -4.5), (66, -10), (256, 3.5), (531, -18), (1400, -14.5), (2550, -22.5),
       (16000, -34.5)]
AIR_DB = -58


def hush():
    m = next_fast_len(N)
    a, b = rfft(rng.standard_normal((2, m)))
    hz = np.fft.rfftfreq(m, 1 / SR)
    air = irfft(pair(a, b, hz) * how_loud(along(AIR, hz)), m)[:, :N]
    return how_loud(AIR_DB) * unit(air)


def scene():
    boards, slide, blows = base(), pellets(), clacks()
    send = how_loud(-4.5) * boards[0] + how_loud(-4.5) * slide[0] + how_loud(-3.5) * blows[1]
    direct = how_loud(2.0) * boards + how_loud(4.0) * slide + how_loud(0.5) * blows
    return direct + room(send) + hush()


# f/Hz, left-right level/dB
MIC_TILT = [(60, -1), (400, -3.5), (1200, -3.5), (4500, -6.5), (9000, -5.5), (14000, -1)]


def low_pass(x):
    return signal.sosfilt(signal.butter(12, 16100, fs=SR, output="sos"), x)


def record(dry):
    side = np.array([[.5], [-.5]])
    held = dry / (1 + np.abs(dry / .85) ** 4) ** (1 / 4)
    mix = filtered(held, lambda hz: how_loud(side * along(MIC_TILT, hz)) * (hz < 15900))
    return low_pass(mix)


dry = scene()
out = record(dry)
store_wav(out)
```